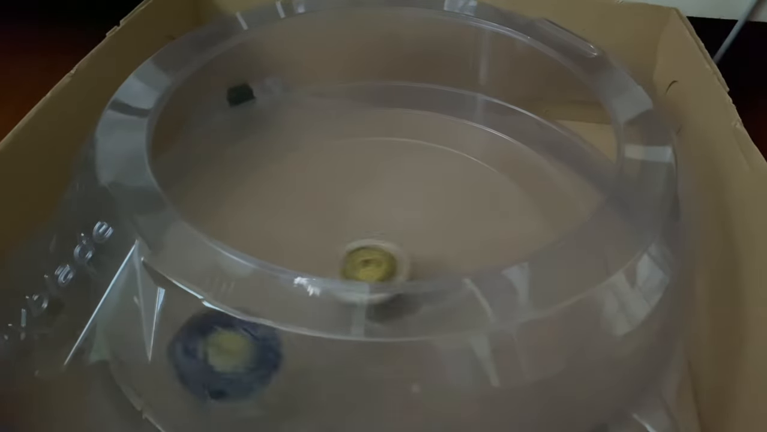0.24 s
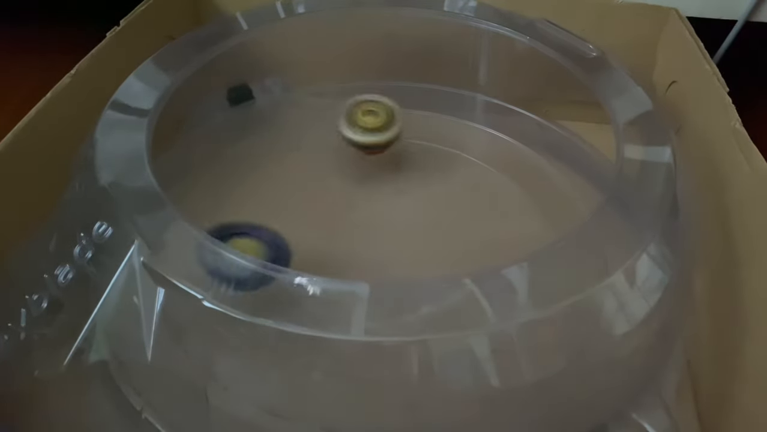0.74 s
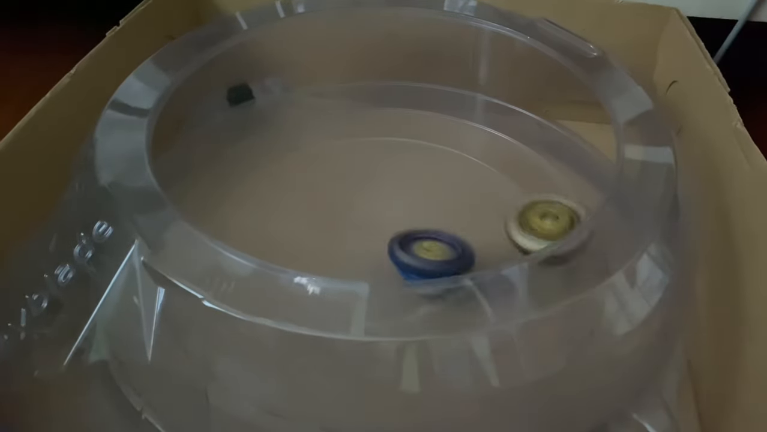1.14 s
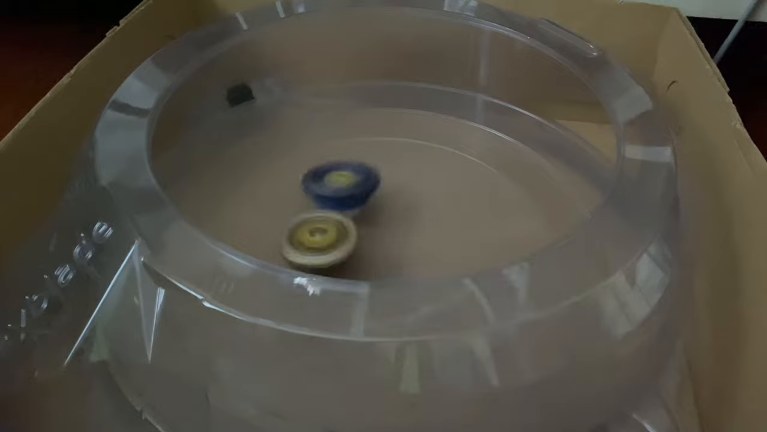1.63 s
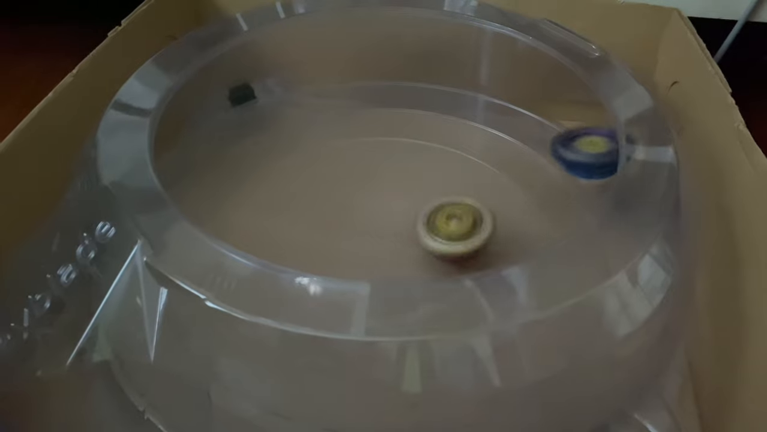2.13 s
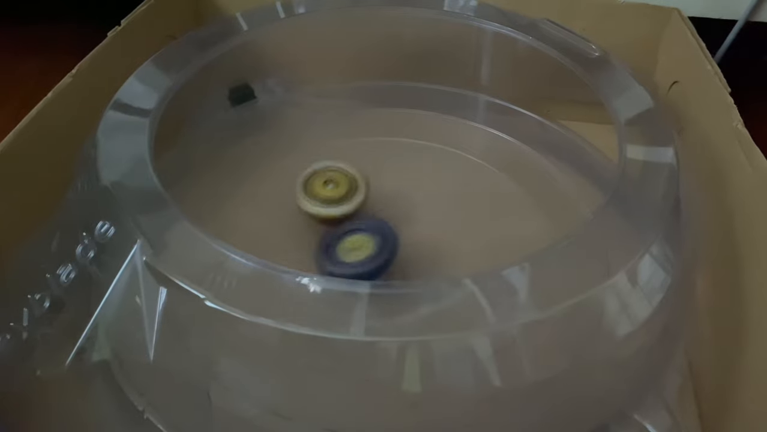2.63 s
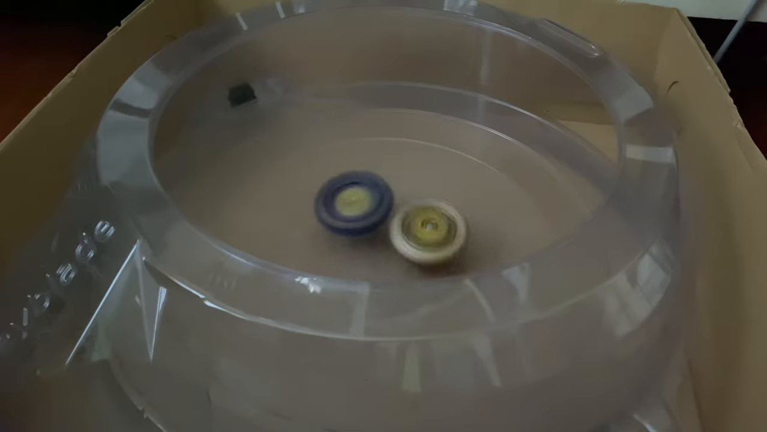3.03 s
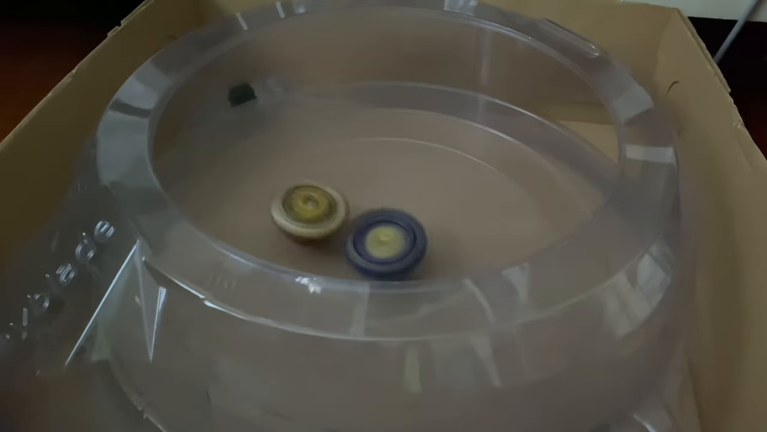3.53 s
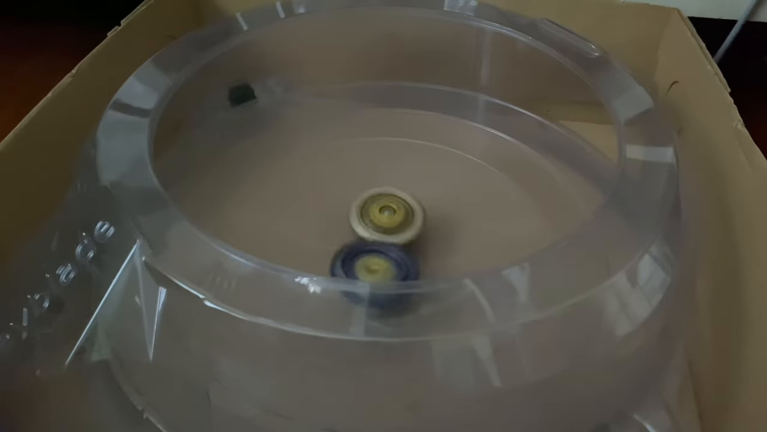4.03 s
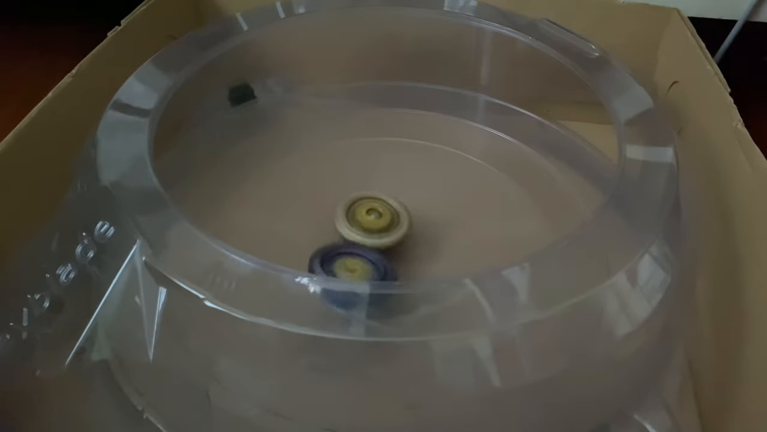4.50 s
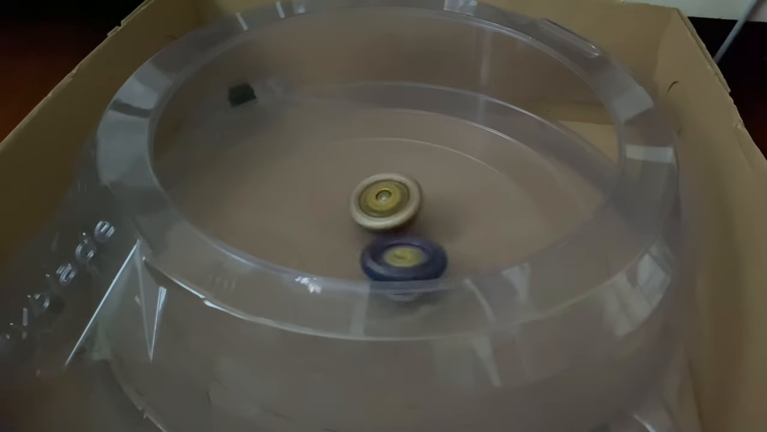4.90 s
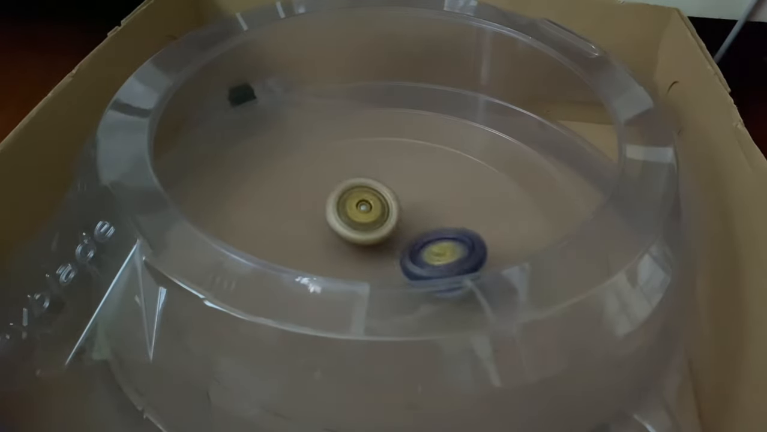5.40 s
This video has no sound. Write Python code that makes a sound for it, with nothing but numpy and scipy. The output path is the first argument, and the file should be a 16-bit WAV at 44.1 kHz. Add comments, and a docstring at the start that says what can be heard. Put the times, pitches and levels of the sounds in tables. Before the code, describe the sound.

Sharp metallic clacks of two toy tops clashing, over the hollow rumble, patter and hiss of their tips on plastic.

```python
"""Two metal-rimmed spinning tops circle in a thin plastic bowl, in a cardboard box in a small room.
They start with a clash: the rims grind, give a dull crack and ring, and rim teeth rattle on the wall.
Then the tips rub and hop on the bowl, which rumbles and thumps, and more clashes lead to a hard hit
at 2.1 s. After a calmer stretch the clashes crowd together, and from 4.6 s a slowing top tilts, so
the rubbing flares more at each hop. Two close microphones hear it all from the left."""
import sys
import numpy as np
from scipy import signal
from scipy.fft import rfft, irfft
from scipy.io import wavfile

SR = 44100
rng = np.random.default_rng(int(sys.argv[2]) if len(sys.argv) > 2 else 0)


def unload_wav(signal):
    """Save mono or channel-first audio to the path in sys.argv[1] as 16-bit WAV at rate SR, clipped to [-1, 1]."""
    wavfile.write(
        sys.argv[1],
        SR,
        np.round(np.clip(np.atleast_2d(signal).T, -1, 1) * 32767).astype(np.int16),
    )


N = 249606

# A mode is a tone at which an object rings; its ring time is how long it takes to fade by 60 dB.
# Low modes of the bowl: f/Hz, level/dB, ring time/s
BOWL_MODES = [(157, -4, .09), (196, -7, .04), (228, -5.5, .06), (290, -5, .045), (345, -6, .04),
              (425, -1, .045), (480, -5, .035), (530, -9, .035), (660, -12, .02), (833, -19, .023),
              (1019, -20, .03), (1240, -22, .03)]
# Short-lived modes of the bowl's wall: f/Hz, level/dB, ring time/s
WALL_MODES = [(540, -7, .025), (805, 3, .022), (985, 3.5, .02), (1190, -1, .02), (1630, 5, .018),
              (1900, 6, .013), (2230, 5.5, .015), (2450, 3, .011), (2800, -4, .01), (3680, -1, .02),
              (3900, -3, .012), (4940, -2, .015), (7000, -6, .004), (15000, -10, .004)]


def rim_clashes():
    """Rims graze, bite and grind. Returns the cracks, the ringing of the tops and the echo tails."""
    # Rims meet: t/s, crack level/dB, ringing against crack/dB, graze before the bite/s, grinding/s,
    # brightness/(dB per octave), favoured f/Hz
    meetings = [(0.03, -10, -12, 0.0025, 0.024, -9.5, 2380), (0.262, -20, -5, 0.014, 0.002, -8.5, 2950),
                (0.4101, -10, -25, 0.0099, 0.0073, 1, 3700), (0.696, -38, -6, 0.0019, 0.0011, -13, 4450),
                (.731, -40, -15, 0.0016, 0.0015, -9, 4450), (0.9898, -8.5, -12, 0.0044, 0.00042, 1.5, 4960),
                (1.2829, -12, -10, 0.0026, 0.0043, 1, 7470), (1.562, -12, -8, 0.00084, 0.0062, 3.5, 4450),
                (1.725, -13, -19, 0.00091, 0.0037, 5.5, 3700),
                (1.7477, -9.5, -12.5, 0.0011, 0.0065, 3.5, 2330),
                (1.866, -34.5, -10, .006, 0.012, -4, 2330), (1.91, -36.5, -12, .004, 0.011, -1, 3700),
                (1.958, -33, -10, .008, .016, -4.5, 4450), (2.1008, -5, -28, 0.00098, 0.0075, -8.5, 3700),
                (2.644, -14, -5, 0.0062, 0.0036, 4, 4450), (3.5369, -10, -8.5, 0.0016, 0.0025, 3.5, 4430),
                (3.7433, -14.5, -7, 0.0032, 0.0048, 1, 3700),
                (3.9266, -11.5, -2.5, 0.0038, 0.0087, 1.5, 2510), (4.0669, -8, -8, 0.004, 0.0048, 3, 5050),
                (4.3517, -15, -11, 0.0041, 0.0049, -1, 2960), (4.512, -15, -10, 0.0041, 0.0012, 2, 1980),
                (4.648, -16, -12.5, 0.0037, 0.0024, 5.5, 2930),
                (4.688, -25.5, -1, 0.0025, 0.0034, -1, 1980), (4.749, -15.5, -8.5, 0.015, 0.0045, 2, 4370),
                (4.839, -17, -7.5, 0.0021, 0.0012, 3.5, 1600), (4.872, -18, -9, 0.0076, 0.0036, 1.5, 1980),
                (4.997, -15, -6, 0.0046, 0.0031, 1, 1980), (5.2655, -16, -9, 0.0066, 0.0054, 0.5, 1600),
                (5.53, -17.5, -6.5, 0.001, 0.0025, 3, 1980), (5.5915, -16.5, -16, 0.004, 0.0014, 5, 2950),
                (5.606, -19.5, -9, 0.0021, 0.0045, 5, 2330)]
    # Modes of the tops: f/Hz, level/dB, ring time/s
    modes = [(1600, -18, .03), (1980, -17, .04), (2330, -15, .05), (2550, -21, .05), (2970, -15, .055),
             (3700, -14, .065), (4440, -13, .07), (4970, -13, .075), (6550, -15, .05), (7470, -12, .06),
             (8450, -16, .03), (10800, -9, .015)]
    # Tone colour of a crack, with a deep notch cut near 13 kHz and the top treble cut off: f/Hz, level/dB
    crack_colour = [(590, -17), (1000, -12), (1750, -26.5), (2320, -8), (2640, -10.5), (4900, -1),
                    (5800, -2.5), (7960, -3.5), (10800, -0.5), (12500, -5), (13400, -63), (14700, 3.5),
                    (15600, -16), (16200, -23), (17000, -81)]
    snap_s, parting_s = .001, .0046   # fade times of the first snap and of the parting rims
    crest_db = 9   # how far noise peaks stand above its average level
    size = 16384
    t = np.arange(size) / SR
    mode_hz = np.array(modes)[:, :1]
    cracks, tails, forces = np.zeros(N + size), np.zeros((2, N + size)), np.zeros((len(modes), N + size))
    for s, crack_db, ring_db, graze, contact, bright_db, favoured_hz in meetings:
        contact = max(contact, 5e-4)
        start = round((s - graze) * SR)
        span = slice(start, start + size)
        held = np.exp(np.minimum(graze + contact - t, 0) / parting_s)
        snap = np.exp((graze - t) / snap_s)
        grind = np.where(t < graze, from_db(-11) * t / graze, held + snap)
        notches = from_db(2.5 * np.repeat(rng.standard_normal(size // 32), 32))   # rims catch unevenly
        crack = grind * notches * noise(crack_colour, bright_db, size)
        cracks[span] += from_db(crack_db - crest_db) * crack
        # Each clash is at a new place, so it has its own echoes; their treble dies sooner.
        onset = np.clip((t - graze) / .00025, 0, 1)
        for tail_db, ring_s, duller_db in (-15.5, .24, 4), (-16, .08, 1.5):
            dying = onset * from_db(crack_db + tail_db - 60 * t / ring_s)
            for tail in tails:
                tail[span] += dying * noise(crack_colour, bright_db - duller_db, size)
        # The mode that belongs to the place struck rings louder.
        favour_db = 8 * np.exp(-(np.log2(mode_hz / favoured_hz) / .1) ** 2)
        strength = from_db(crack_db + ring_db + favour_db + rng.normal(0, .59, mode_hz.shape))
        roughness = rng.standard_normal((len(modes), size)) / np.sqrt((contact + parting_s) * SR)
        forces[:, span] += strength * grind * roughness
    ringing = sum(from_db(db) * ring(force, hz, ring_s) for force, (hz, db, ring_s) in zip(forces, modes))
    return cracks[:N], ringing[:N], tails[:, :N]


def tip_landings():
    """Tips hop singly or, as a top wobbles, in even runs. Rows: t/s, level/dB, f/Hz, scuff/dB."""
    # Single landings: t/s, level/dB, f/Hz of the spot struck
    hops = [(0.043, -17, 280), (0.331, -20, 327), (0.384, -25, 260), (0.698, -21, 468), (1.286, -21, 380),
            (1.343, -28, 222), (0.996, -12, 183), (1.758, -21, 397), (2.053, -30, 199), (2.106, -16, 482),
            (2.731, -24.5, 194), (2.819, -17.5, 187), (2.872, -28, 248), (2.932, -18, 204),
            (2.988, -19.5, 179), (3.02, -21.5, 308), (3.069, -22.5, 268), (3.61, -22, 173),
            (3.746, -21, 343), (3.928, -14.5, 370), (3.989, -23, 270), (4.068, -16, 398), (4.355, -21, 275),
            (4.515, -27.5, 440), (4.771, -18.5, 263), (4.824, -18.5, 257), (4.866, -14.5, 237),
            (4.896, -23, 275), (5.409, -28, 280)]
    # Runs of hops: first t/s, last t/s, gap/s, first level/dB, last level/dB, f/Hz, scuff against hop/dB
    wobbles = [(.198, .41, .053, -26, -23, 350, -18), (.512, .645, .033, -23, -25, 400, -18),
               (.731, .858, .043, -28, -34, 200, -24), (.947, 1.146, .05, -22, -16, 220, -22),
               (1.177, 1.243, .033, -18, -24, 280, -21), (1.397, 1.448, .0255, -23, -25, 240, -22),
               (1.479, 1.656, .035, -22, -21, 250, -22), (1.816, 2.001, .046, -27, -20, 350, -16),
               (2.226, 2.404, .0445, -24, -22, 340, -21), (2.491, 2.585, .047, -28, -29, 300, -16),
               (2.624, 2.684, .03, -23, -23, 320, -22), (3.097, 3.378, .0467, -23, -32, 270, -19),
               (3.425, 3.474, .049, -27, -26, 270, -21), (4.096, 4.23, .027, -22, -29, 260, -16),
               (4.607, 4.712, .034, -29, -19, 250, -14), (4.922, 5.019, .032, -19, -19, 290, -16),
               (5.049, 5.378, .0329, -19, -19, 330, -15.5), (5.443, 5.644, .0335, -21, -21, 300, -17)]
    single_scuff_db = -19.5
    landings = [(*hop, single_scuff_db) for hop in hops]
    chance = rng.standard_normal((len(wobbles), 40, 3))
    for (first, last, gap, first_db, last_db, hz, scuff_db), draws in zip(wobbles, chance):
        steps = round((last - first) / gap)
        for k, (late, louder, higher) in enumerate(draws[:steps + 1]):
            s = first + (last - first) * k / steps + .001 * late
            db = first_db + (last_db - first_db) * k / steps + 1.2 * louder
            landings.append((s, db, hz * 2 ** (.13 * higher), scuff_db))
    return landings


def bowl_thumps(landings):
    """A landing tip dents the bowl, which swings a few times; it also scuffs and rings the modes."""
    # Tone colour of a scuff: f/Hz, level/dB
    scuff_colour = [(400, 8.5), (650, 3.5), (1000, -24.5), (1300, -5), (1750, -2.5), (2020, -15),
                    (2300, -13), (2620, -15.5), (2950, -8.5), (3600, -22), (4500, -4.5), (7000, -27),
                    (11000, -16.5), (16000, -42)]
    dent_fade_s, size = .0042, 2048
    t = np.arange(size) / SR
    dents, ticks, blows = np.zeros(N + size), np.zeros(N), np.zeros(N)
    for s, peak_db, spot_hz, scuff_db in landings:
        i = min(round(s * SR), N - 1)
        rise = .002 + .3 / spot_hz   # broad, low spots take longer to swing
        swell = np.where(t < rise, np.sin(np.pi * t / rise / 2) ** 2, np.exp((rise - t) / dent_fade_s))
        phase = 2 * np.pi * spot_hz * t * (1 - 4.2 * t)   # pitch sags as the tip lifts
        dents[i:i + size] += from_db(peak_db) * swell * (np.sin(phase) + .42 * np.sin(1.55 * phase))
        ticks[i], blows[i] = from_db(peak_db + scuff_db), from_db(peak_db - 14.5)
    wall_taps = from_db(-9) * strike(ticks, WALL_MODES[1:9])
    scuff_shape = (t / .003) * np.exp(1 - t / .003) + .25 * np.exp(-t / .015)
    scuffs = signal.fftconvolve(ticks, scuff_shape)[:N] * noise(scuff_colour)
    return dents[:N] + wall_taps + scuffs + strike(blows, BOWL_MODES)


def wall_knocks():
    """A top runs into the wall and its rim teeth beat on it: even beats buzz, uneven ones rattle."""
    # Knocks: t/s, level/dB, contact/s, gap between teeth/s, brightness/(dB per octave),
    # loss per tooth/dB, unevenness/s
    knocks = [(.028, -25, .008, .0041, 5, 0, 0), (.0388, -14, .014, .0045, -5, 4, .001),
              (.312, -45, .02, .003, -6, -1.2, .001), (1.866, -37, .016, .0028, -1, 0, .001),
              (2.001, -31, .008, .004, 0, 3, .001), (2.1022, -10.5, .009, .00492, 2, 0, 0)]
    out, tooth_slips = np.zeros(N), rng.standard_normal((len(knocks), 12))
    for mode, (hz, mode_db, ring_s) in enumerate(WALL_MODES):
        force = np.zeros(N)
        for (s, db, contact, gap, bright_db, loss_db, uneven), slips in zip(knocks, tooth_slips):
            for k, slip in enumerate(slips):
                touching = np.clip(1 + (contact - k * gap) / gap, 0, 1)
                beat_s = s + k * gap + uneven * slip * (k > 0)
                beat_db = db - loss_db * k + bright_db * np.log2(hz / 1500) + rng.normal(0, 1.5)
                force[round(beat_s * SR)] += touching * from_db(beat_db)
        out += (-1) ** mode * from_db(mode_db) * ring(force, hz, ring_s)
    return out


def bowl_rumble(level_db):
    """Rolling tips stir the bowl's modes with small bumps, and the whole bowl sways in the bass."""
    # Tone colour of the sway: f/Hz, level/dB
    sway_colour = [(18, -59), (30, -16), (52, -11.5), (75, -0.5), (91, -1), (112, -28), (150, -55),
                   (250, -120)]
    rolling = sum(from_db(db) * ring(clicks(per_s=200, spread_db=0), hz, ring_s)
                  for hz, db, ring_s in BOWL_MODES)
    rumble = from_db(level_db + 2 * drift(rate_hz=25)) * rms_one(rolling)
    sway_db = -43.5 + .28 * (level_db - level_db.mean())   # partly follows the rumble
    return rumble + from_db(sway_db) * noise(sway_colour)


def tip_chatter(landings):
    """How hard the tips rub: it jumps at each speck of grit and when a landing presses a tip down."""
    tilt_s, tilted_press, upright_press = 4.6, 2.4, .6
    grit = fade_each(abs(clicks(per_s=140, spread_db=2.5)), fade_s=.0025)
    at = np.minimum(np.array(landings)[:, 0] * SR, N - 1).astype(int)
    presses = np.zeros(N)
    presses[at] = np.where(at < tilt_s * SR, upright_press, tilted_press)
    presses[at] *= from_db(2.5 * rng.standard_normal(len(at)))
    return rms_one(1 + .33 * grit + fade_each(presses, fade_s=.007))


def tip_hiss(rubbing):
    """Tips rubbing on plastic hiss. Returns a direct part and a part spread over left and right."""
    # Tone colour of the hiss: f/Hz, level/dB
    hiss_colour = [(350, 1), (600, -15.5), (711, 5), (912, -7), (1020, -2), (2450, -10.5), (2770, -16.5),
                   (4880, -15), (9000, -42), (11700, -42), (19800, -120)]
    spread = from_db(-3.5) * rubbing * np.array([noise(hiss_colour), noise(hiss_colour)])
    return from_db(-10.5) * rubbing * noise(hiss_colour), spread


def top_whirr(strength):
    """The spinning tops give a bright whirr, spread over left and right."""
    # Tone colour of the whirr, with a notch cut near 14 kHz and the top treble cut off: f/Hz, level/dB
    whirr_colour = [(2940, -1), (5000, -6), (6360, -5.5), (11400, -8), (13300, -15.5), (13900, -29.5),
                    (15000, -9), (16100, -9), (17000, -79.5)]
    return strength * np.array([noise(whirr_colour), noise(whirr_colour)])


def room_echo(x):
    """The room sends back dense echoes, different at each microphone; middle pitches last longest."""
    # How long the room rings: f/Hz, ring time/s
    ring_times = [(200, 0.067), (1000, 0.26), (4000, 0.14), (12000, 0.032)]
    t = np.arange(SR // 2) / SR
    edges_hz, tail = 50 * 2 ** np.arange(0, 8.6, .5), 0
    for low, high in zip(edges_hz, edges_hz[1:]):
        band_filter = signal.butter(2, [low, high], "band", fs=SR, output="sos")
        band = signal.sosfilt(band_filter, rng.standard_normal((2, len(t))))
        tail = tail + band * from_db(-60 * t / at_hz(ring_times, np.sqrt(low * high)))
    tail = tail * np.clip(t / .0079, 0, 1) / np.sqrt(np.sum(tail ** 2) / 2)
    return signal.fftconvolve(x[None], tail, axes=1)[:, :N]


def microphones(x):
    """Direct sound reaches the left microphone first and the right one 4 samples later."""
    return np.array([from_db(-2) * x, from_db(-1.5) * np.r_[np.zeros(4), x[:-4]]])


def from_db(db):
    """Turn a level in dB into a number to multiply by."""
    return 10 ** (np.asarray(db) / 20)


def rms_one(x):
    """Scale a signal so that its average size (root mean square) is 1."""
    return x / np.sqrt(np.mean(x ** 2) + 1e-20)


def at_hz(points, hz):
    """Read between the rows of a frequency table, with octaves evenly spaced."""
    known_hz, values = np.transpose(points)
    return np.interp(np.log(hz + 1), np.log(known_hz), values)


def noise(colour, bright_db=0, size=N):
    """Noise of a given tone colour, tilted by bright_db per octave above 1500 Hz."""
    hz = np.arange(size // 2 + 1) * SR / size
    gain = from_db(at_hz(colour, hz) + bright_db * np.log2(np.maximum(hz, 1500) / 6000))
    return rms_one(irfft(rfft(rng.standard_normal(size)) * gain, size))


def drift(rate_hz):
    """A smooth random wander of average size 1."""
    r = np.exp(-80 * np.pi * rate_hz / SR)
    slow = signal.lfilter([1], [1, -2 * r, r * r], rng.standard_normal(N // 40 + 2002))[2000:]
    return np.interp(np.arange(N) / 40, np.arange(len(slow)), rms_one(slow))


def ring(force, hz, ring_s):
    """One mode: each click in the force starts a fading sine wave of the same height."""
    r, w = from_db(-60 / (ring_s * SR)), 2 * np.pi * hz / SR
    return signal.lfilter([0, np.sin(w)], [1, -2 * r * np.cos(w), r * r], force + 1e-18)


def strike(hits, modes):
    """Each hit rings every mode by a random amount."""
    return sum(from_db(db) * ring(hits * rng.standard_normal(N), hz, ring_s) for hz, db, ring_s in modes)


def clicks(per_s, spread_db):
    """Random clicks of either sign; spread_db makes their sizes uneven."""
    sizes = from_db(spread_db * np.minimum(rng.exponential(1, N), 5)) * rng.choice([-1, 1], N)
    return sizes * (rng.random(N) < per_s / SR)


def fade_each(jumps, fade_s):
    """Let each jump ease off to about a third in fade_s."""
    return signal.lfilter([1], [1, -np.exp(-1 / fade_s / SR)], jumps + 1e-18)


def scene():
    """Add up bowl, tips, clashes and knocks, heard directly and through the room."""
    # Loudness of the rolling tops: t/s, rumble level/dB, hiss level/dB, whirr level/dB
    rolling_levels = [(0, -36, -30.5, -47), (.15, -36.5, -36.5, -53), (.43, -34.5, -39.5, -46),
                      (.62, -36.5, -41.5, -60), (.8, -47.5, -55.5, -68), (.94, -39.5, -45.5, -54),
                      (1.17, -32, -35.5, -51), (1.39, -39.5, -43.5, -66), (1.59, -34.5, -37, -48),
                      (1.75, -35, -45, -40), (2.08, -35.5, -36.5, -55), (2.36, -35, -45.5, -48.5),
                      (2.57, -40, -48, -57.5), (2.75, -37, -40.5, -55.5), (3.07, -35.5, -44, -48.5),
                      (3.3, -40.5, -50.5, -56), (3.55, -38.5, -44.5, -55.5), (4.03, -36, -49, -47.5),
                      (4.18, -39, -67, -49.5), (4.3, -51, -61, -67), (4.45, -58.5, -70, -62),
                      (4.57, -44, -49, -59), (4.75, -34.5, -43, -49.5), (5.14, -35.5, -64, -45.5),
                      (5.4, -39.5, -59, -55), (5.66, -38, -45, -58)]
    times, *levels = np.transpose(rolling_levels)
    rumble_db, hiss_db, whirr_db = [np.interp(np.arange(N) / SR, times, db) for db in levels]
    landings = tip_landings()
    bowl = bowl_rumble(rumble_db) + bowl_thumps(landings)
    chatter = tip_chatter(landings)
    rubbing = from_db(hiss_db + 1.5 * drift(rate_hz=30)) * chatter
    cracks, ringing, tails = rim_clashes()
    knocks = wall_knocks()
    direct_hiss, spread_hiss = tip_hiss(rubbing)
    whirr = top_whirr(from_db(whirr_db) * chatter)
    direct = microphones(bowl + cracks + ringing + knocks + direct_hiss)
    echoes = room_echo(from_db(-13.5) * knocks + from_db(-9) * (ringing + bowl))
    return direct + spread_hiss + whirr + tails + echoes


def record(dry):
    """Cut the deep bass, round off the peaks, then cut the highest treble."""
    bass_cut = signal.butter(3, 55, "high", fs=SR, output="sos")
    treble_cut = signal.cheby2(12, 70, 17150, fs=SR, output="sos")
    rounded = np.tanh(signal.sosfilt(bass_cut, dry))
    return signal.sosfilt(treble_cut, rounded)


dry = scene()
out = record(dry)
unload_wav(out)
```